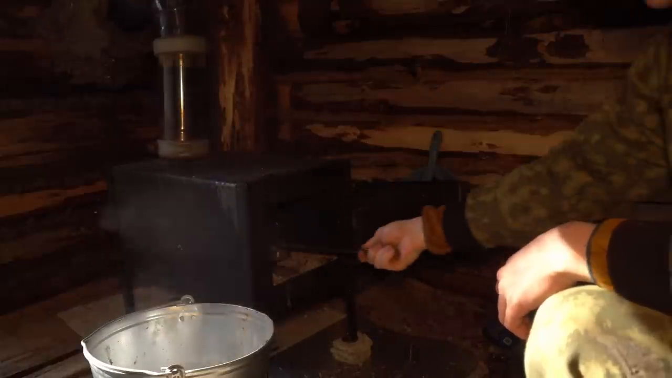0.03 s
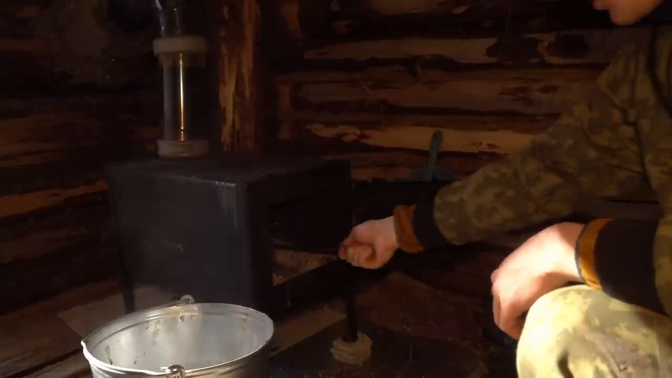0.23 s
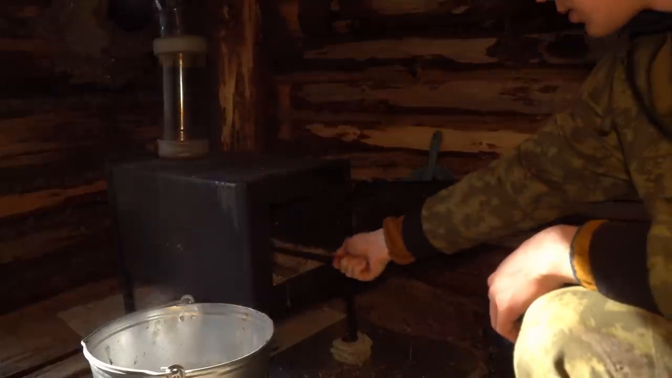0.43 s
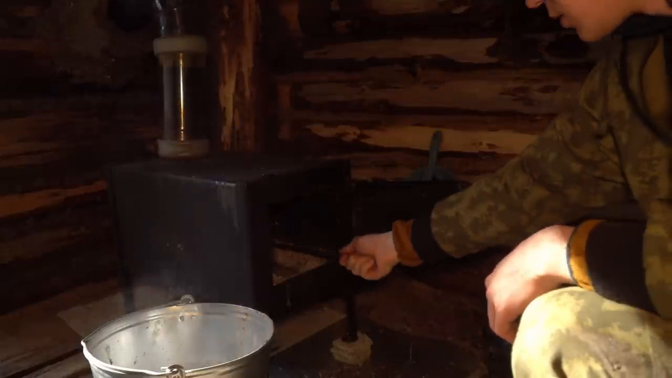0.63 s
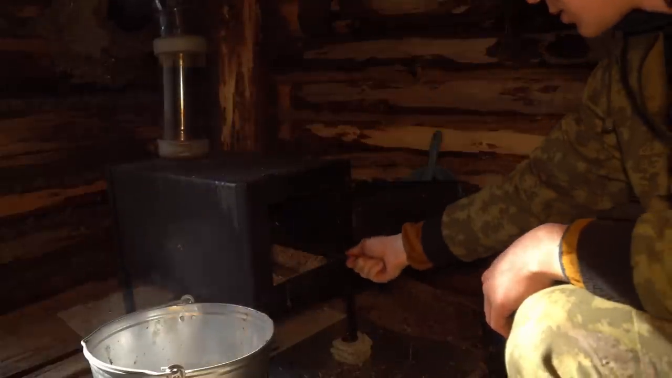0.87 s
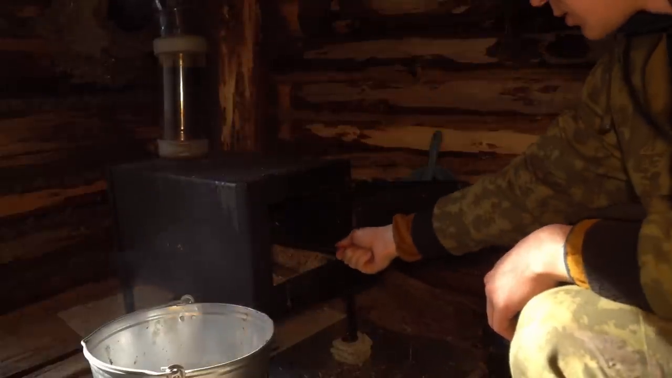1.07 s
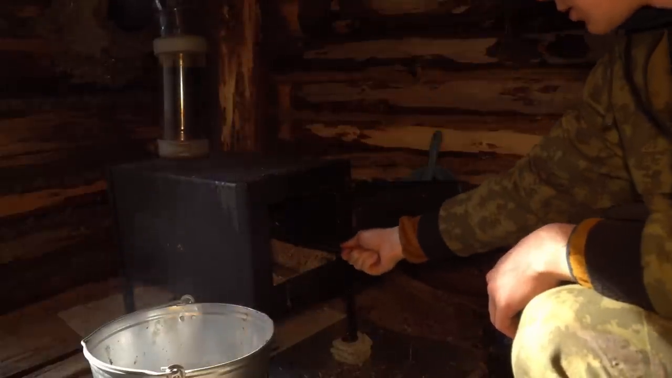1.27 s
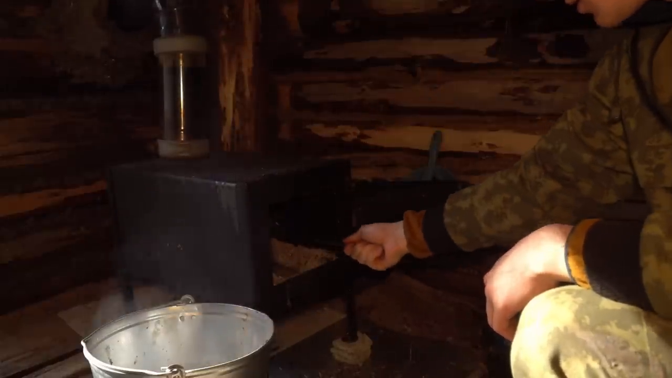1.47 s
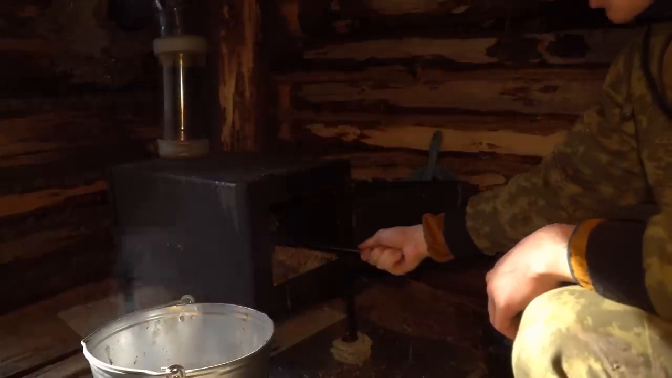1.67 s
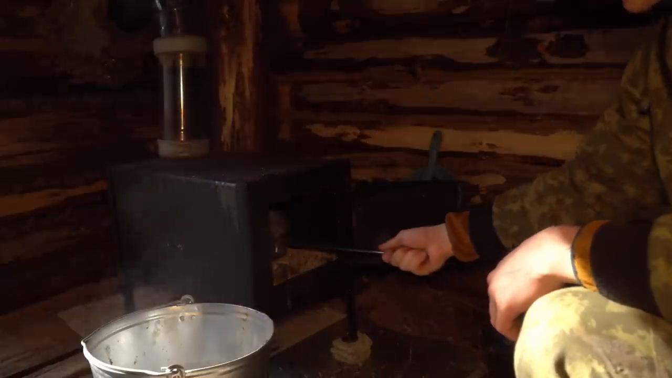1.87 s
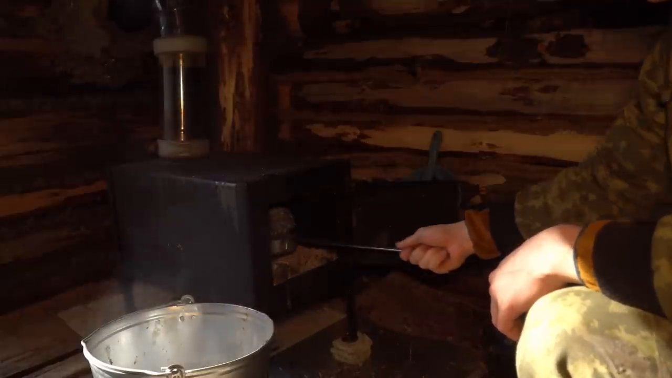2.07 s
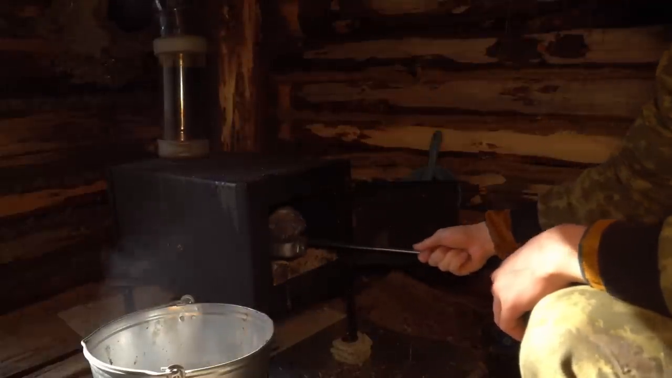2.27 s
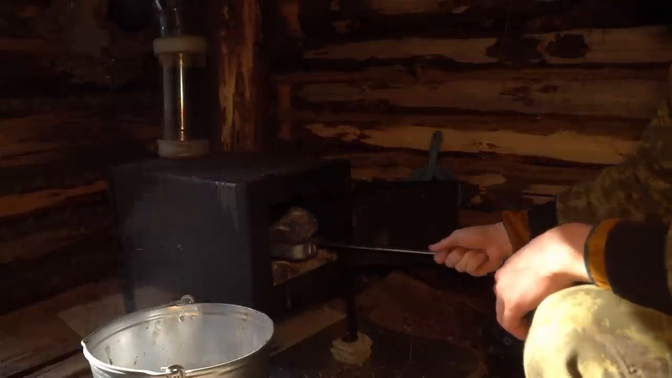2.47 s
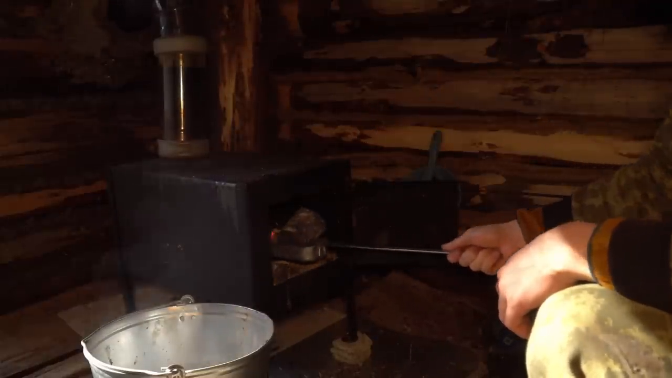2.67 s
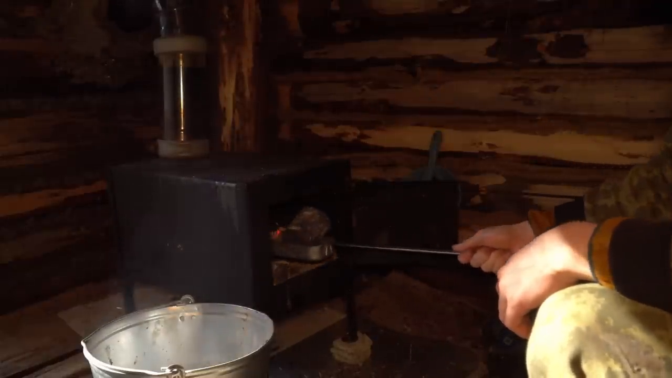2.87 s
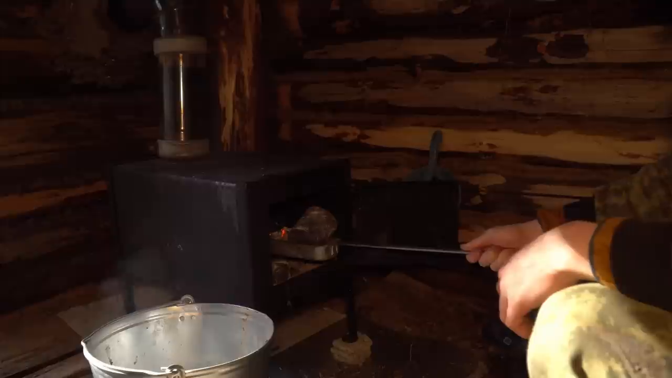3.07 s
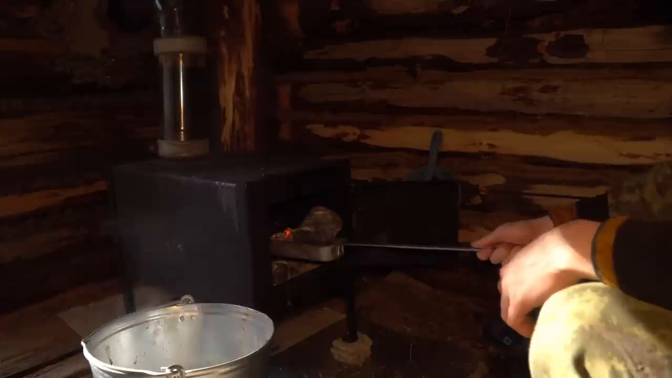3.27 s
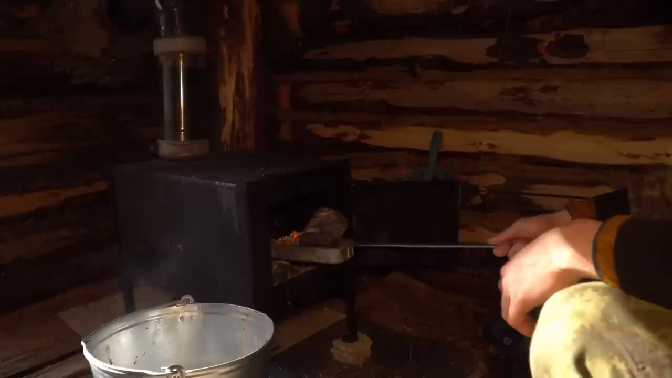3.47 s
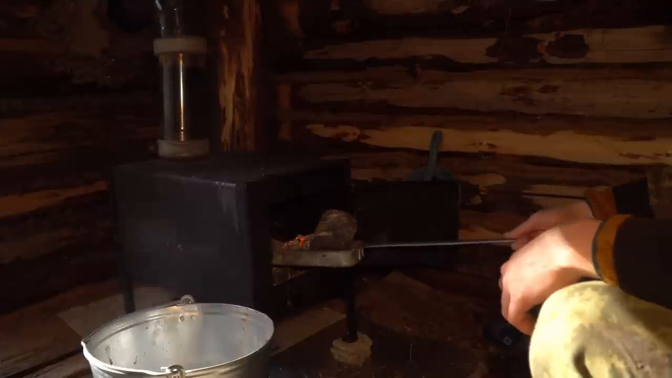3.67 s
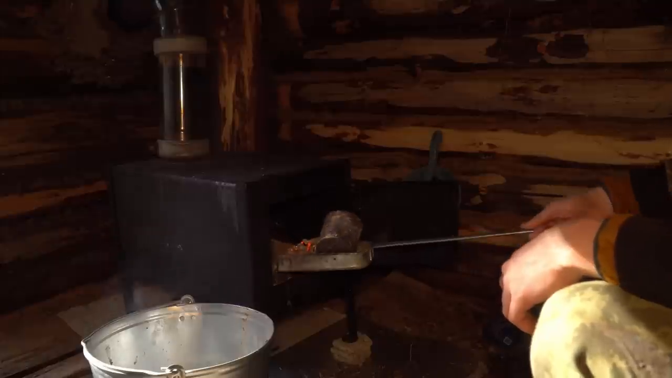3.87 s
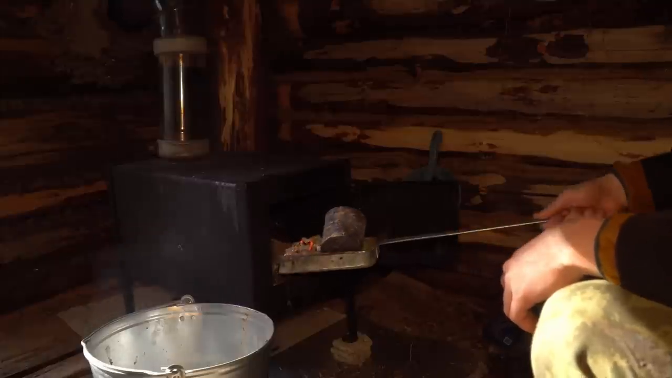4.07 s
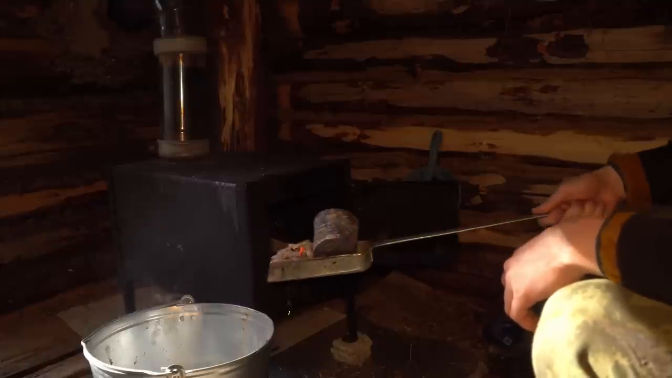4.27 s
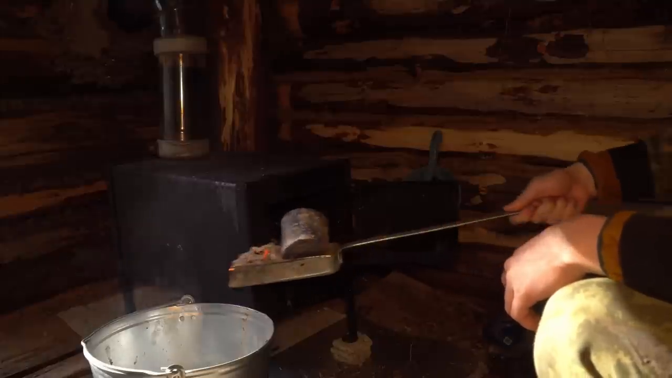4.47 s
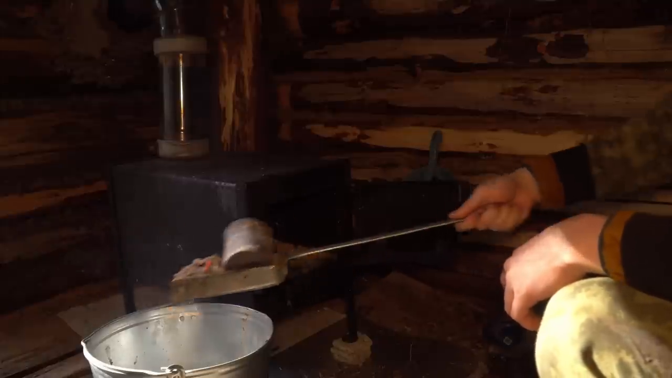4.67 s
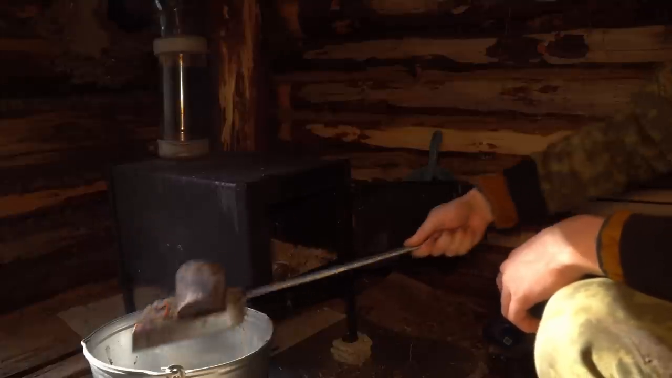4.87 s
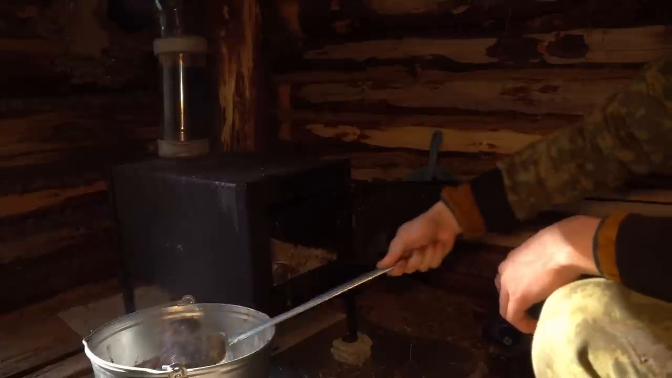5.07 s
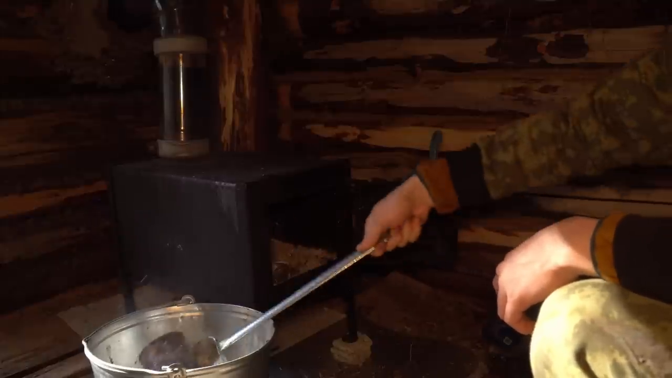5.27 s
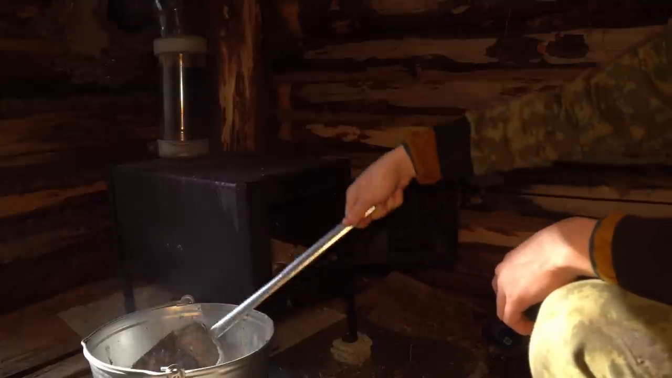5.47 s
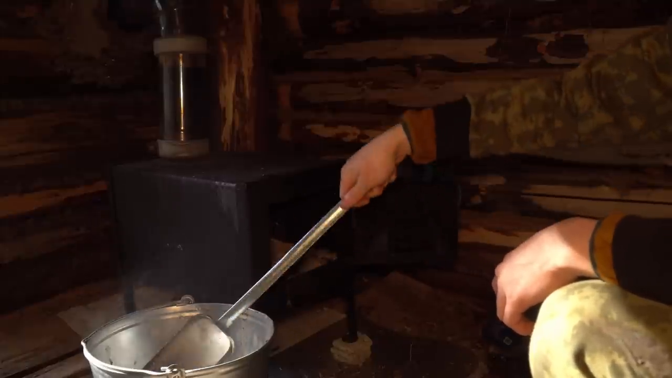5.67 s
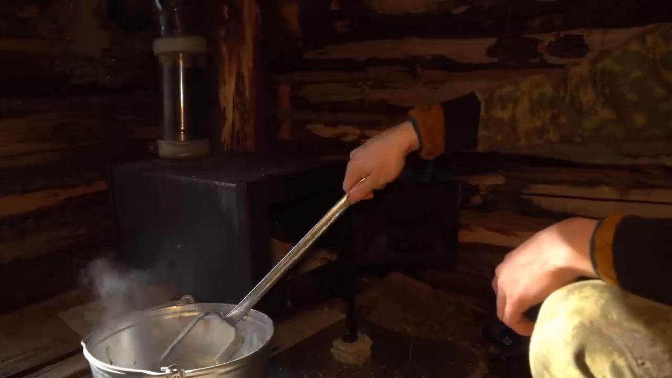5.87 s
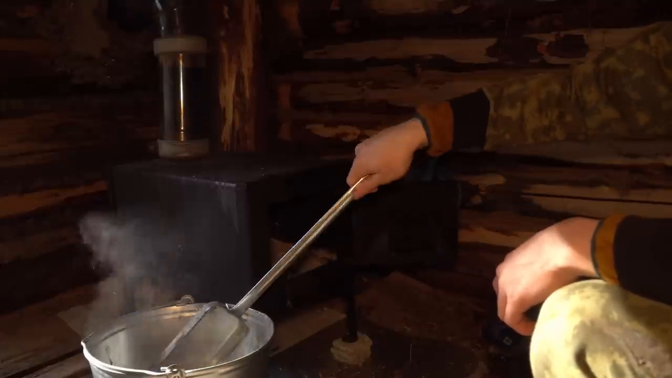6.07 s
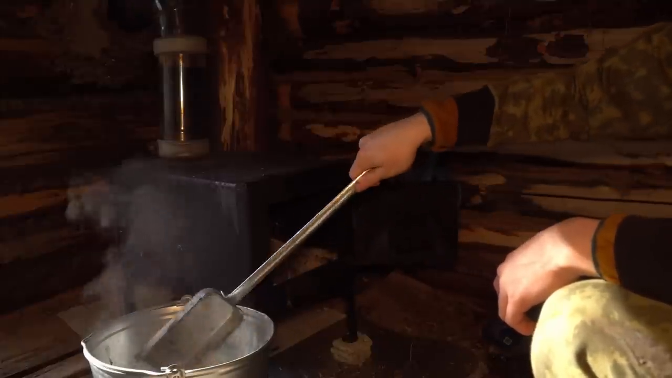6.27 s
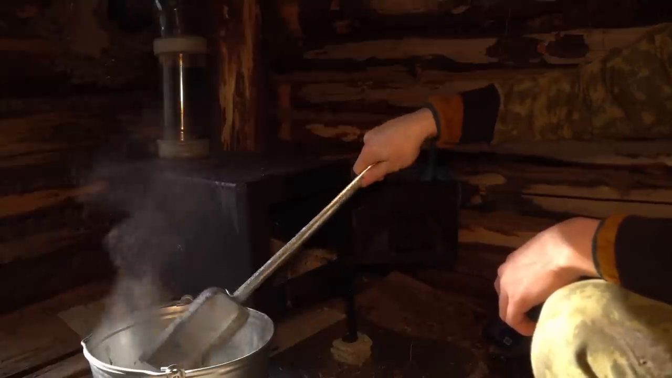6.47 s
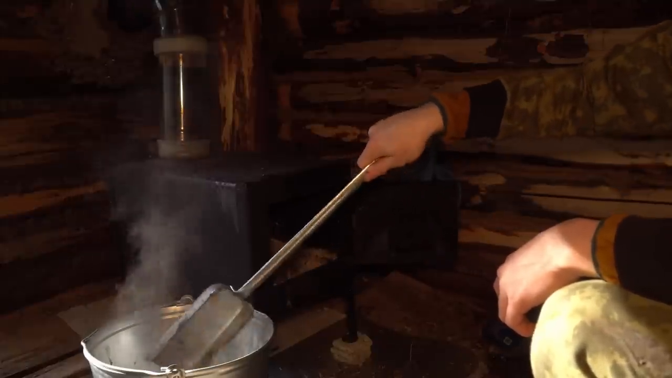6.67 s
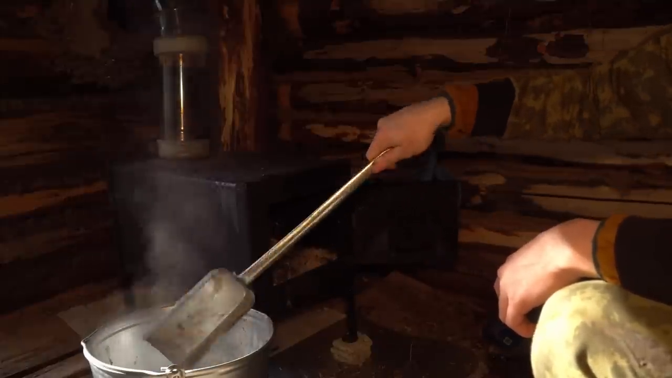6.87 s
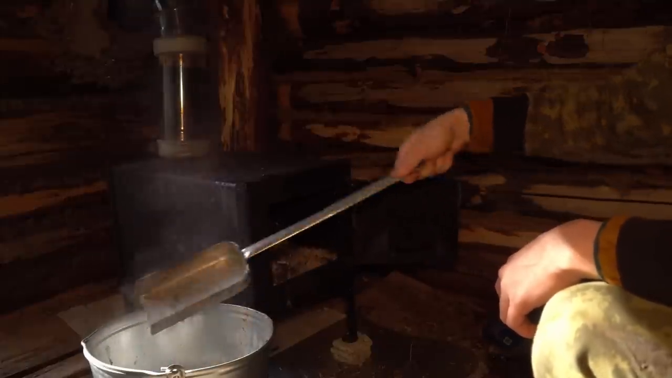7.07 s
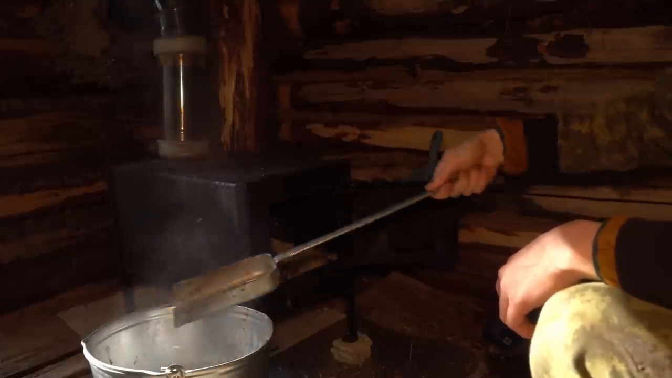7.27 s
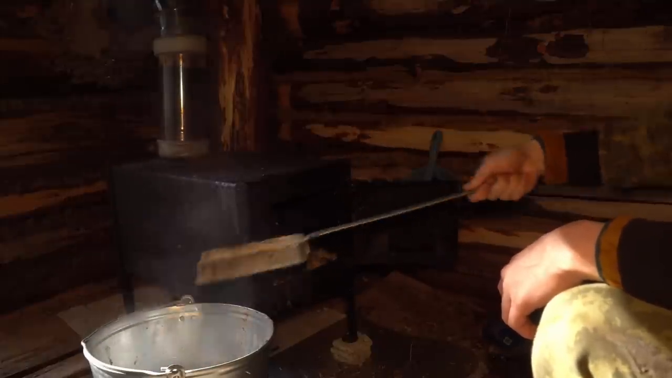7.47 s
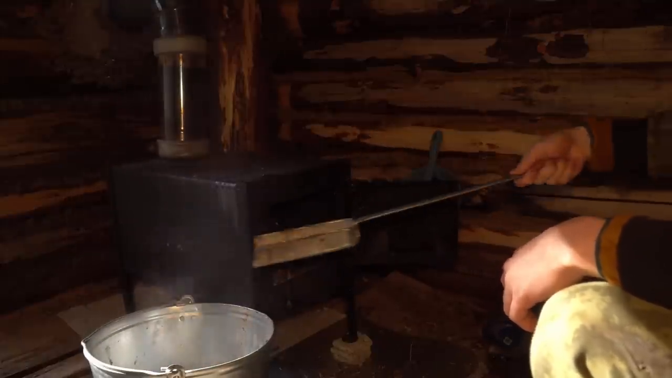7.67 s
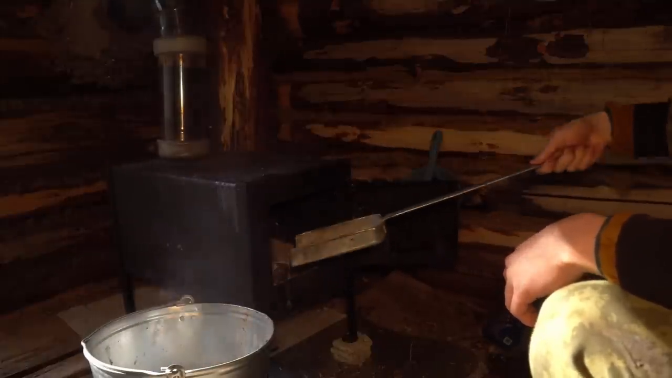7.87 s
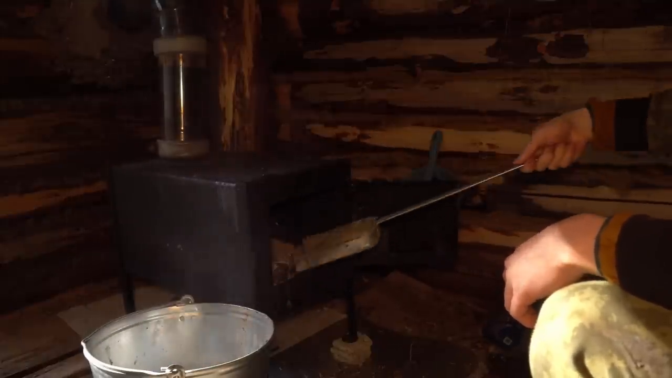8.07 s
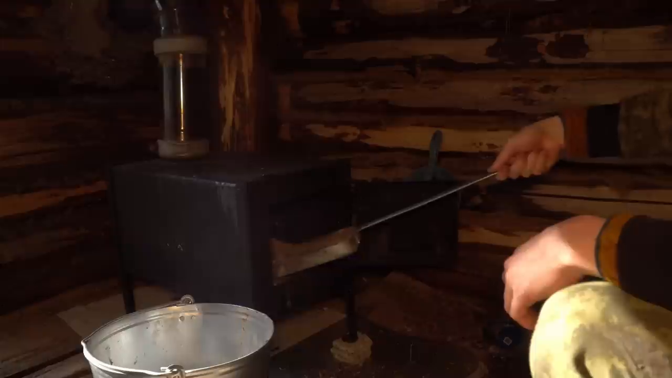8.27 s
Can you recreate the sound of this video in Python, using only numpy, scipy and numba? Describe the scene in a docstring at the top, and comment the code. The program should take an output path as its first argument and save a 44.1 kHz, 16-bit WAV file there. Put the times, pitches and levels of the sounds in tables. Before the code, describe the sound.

Close, mono sound in a small log cabin with a short, soft room. From 0 to 1.5 s a steel scoop rakes ash in a sheet-steel stove: coarse, gritty scrapes, sharp clanks at about 0.05 and 0.85 s, and a dense, ringing flurry at 1.25-1.4 s, over deep rumbling boards. Light ticks trail off by 1.9 s. From 2 to 3.5 s it is quiet: a faint, far finch sings fast sliding whistles, with dull wooden knocks near 2.3, 2.6 and 3.5 s. A soft low rush swells at 3.7-4.5 s with barely audible ticks. At 5.13 s the load hits a tin bucket with a loud crack and boom; scrapes and raps follow, strong at 5.76, 6.04 and 6.1 s, the last ringing. Then faint ember ticks, tiny clicks and thin high bird calls from 7.3 s, until a hard clank and brief scrape at 8.24 s.

```python
"""Raking ash from a stove

A long steel scoop rakes ash and embers in a sheet-steel stove, tips them into a tin bucket and goes back.
Noise grains make the grit; drags and blows ring the resonances of scoop, stove and bucket.
Knocks and a deep rumble come through the boards. Outside the log cabin, gliding whistles make a far finch.
Shaped noise makes the quiet air.
"""
import sys
import numpy as np
from scipy import signal
from scipy.fft import rfft, irfft, next_fast_len
from scipy.io import wavfile
from scipy.ndimage import uniform_filter1d
from numba import njit

SR = 44100
rng = np.random.default_rng(int(sys.argv[2]) if len(sys.argv) > 2 else 0)


def put_to_file(sound):
    """Save the sound as 16-bit audio at rate SR, in the file named by the first command-line argument."""
    columns = np.atleast_2d(sound).T  # one column per channel
    safe = np.clip(columns, -1, 1)
    whole_steps = np.round(safe * 32767)
    wavfile.write(sys.argv[1], SR, whole_steps.astype(np.int16))


N = 366471

# stages of the work: (start [s], scoop damping [1/s], stove or bucket damping [1/s],
#   grit on the bare rim against the drag [dB], grit on the stove or bucket against the drag [dB])
WORK_STAGES = [(0, 127, 22, -27, -36.5), (.5, 118, 40, -33.5, -44), (1.25, 57, 3.4, -36, -63),
               (1.43, 21, 8.2, -34, -34), (4.75, 37, 4, -29.5, -52), (5.13, 140, 12, -22.5, -48),
               (5.2, 57, 6.3, -31, -36.5), (5.53, 29, 7.4, -27, -52.5), (5.821, 7.3, 4, -35, -32.5),
               (6.1, 160, 4, -17, -43), (6.25, 43, 4.1, -29, -20), (6.8, 53, 4, -26, -49),
               (7.37, 6.6, 4.7, -35, -50), (8.229, 73, 9.6, -16.5, -49)]
# the scoop is over the bucket: (from [s], until [s])
OVER_BUCKET = (4.7, 7.6)


def shovelling():
    """Grit and blows crackle, shake the scoop and boom in whichever vessel the scoop is in."""
    t = np.arange(N) / SR
    in_bucket = (t > OVER_BUCKET[0]) & (t < OVER_BUCKET[1])
    since, *settings = np.transpose(WORK_STAGES)
    stage = np.clip(np.searchsorted(since, t) - 1, 0, None)
    scoop_damping, vessel_damping, rim_db, vessel_db = np.array(settings)[:, stage]
    crackle, on_rim, on_blade, on_vessel = drags(in_bucket, rim_db, vessel_db)
    add_blows(crackle, on_rim, on_blade, on_vessel)
    add_ember_ticks(crackle)
    return (crackle + scoop(on_blade, on_rim, scoop_damping)
            + stove_and_bucket(on_vessel, in_bucket, vessel_damping))


# drags through ash and slides of the load: (start [s], length [s], grit [dB], push on the scoop before a cut [dB])
DRAGS = [(-.03, .13, -33, -34), (0.109, .32, -37.5, -19.5), (0.486, 0.42, -59.5, -47),
         (0.888, 0.11, -51.5, -41), (0.941, .06, -47.5, -43), (1.009, .08, -37, -22.5),
         (1.141, 0.065, -42.5, -39), (1.254, 0.012, -17.5, -25), (1.323, 0.03, -25.5, -21.5),
         (1.381, 0.036, -38, -27.5), (1.479, 0.48, -53, -73), (3.8, 0.84, -76, -72),
         (4.779, 0.12, -56, -58.5), (4.924, 0.069, -50, -62.5), (5.12, 0.044, -33, -15),
         (5.19, 0.095, -54, -28.5), (5.291, 0.14, -41, -50.5), (5.473, .14, -49.5, -42),
         (5.605, 0.14, -38.5, -24.5), (5.739, 0.057, -29, -35), (5.838, 0.19, -56.5, -53),
         (6.045, 0.068, -40.5, -38.5), (6.095, 0.052, -23, -17.5), (6.219, 0.35, -63.5, -71),
         (6.85, 0.41, -71, -87), (8.236, 0.019, -28, -36)]
DRAG_ATTACK_S, DRAG_RELEASE_S = .008, 0.024
# tone of ash on the stove floor: (pitch [Hz], relative level [dB per Hz])
STOVE_ASH = [(180, -44), (300, -8.5), (546, -13.5), (737, -2.5), (1840, -19.5), (4910, -16.5), (6620, -24),
             (14500, -31.5), (16000, -31)]
# tone of ash and embers against tin: (pitch [Hz], relative level [dB per Hz])
BUCKET_ASH = [(180, -35), (300, -15.5), (565, -19.5), (787, -7.5), (1010, -21), (1360, -14), (2170, -19),
              (2880, -12), (16000, -39.5)]
CINDER_DB, CINDERS_PER_S = -12.5, 250  # hard bits that snap in the grit, level against the drag
EMBER_DB, EMBERS_PER_S = -80.5, 35  # faint crackle of the glowing load


def drags(in_bucket, rim_db, vessel_db):
    """Grains of grit scrape past an edge that sticks and slips; they are heard directly and push the metal."""
    start, length, grit_db, blade_db = np.transpose(DRAGS)
    grit = swells(start, length, grit_db, DRAG_ATTACK_S, DRAG_RELEASE_S)
    blade = swells(start, length, blade_db, DRAG_ATTACK_S, DRAG_RELEASE_S)
    slips = stick_slip(120, .005, 1.)
    ash = grains(9000, 1.1)
    ash = np.where(in_bucket, unit(colour(ash, BUCKET_ASH)), unit(colour(ash, STOVE_ASH)))
    cinders = undb(CINDER_DB) * snaps(CINDERS_PER_S, 4, 0.00069)
    embers = undb(EMBER_DB) * snaps(EMBERS_PER_S, 3, .004)
    crackle = grit * (slips * ash + cinders) + embers
    on_rim = undb(rim_db) * grit * slips * grains(1700, 1.2)
    on_blade = undb(-35.5) * blade * slips * grains(1200, 3.3)
    on_vessel = undb(vessel_db) * grit * grains(400, 1.2)
    return crackle, on_rim, on_blade, on_vessel


# blows of the scoop: (time [s], crack level [dB], crack centre [Hz], scoop push before a boost [dB],
#   stove or bucket push before a boost [dB], clink against crack before a boost [dB], clink centre [Hz])
BLOWS_OF_SCOOP = [(0.0538, -16, 1220, -16, -39.5, 0, 1250), (0.2664, -29, 1300, -21.5, -45, 1, 1320),
                  (0.3895, -30, 1390, -13, -29.5, 4, 1070), (0.4054, -27.5, 1160, -17, -74, 12, 1180),
                  (0.7667, -35.5, 1100, -41, -58, 2, 1050), (0.8445, -13.5, 1060, -16, -38.5, 0, 1120),
                  (0.9133, -37, 1130, -30, -59, 7, 1150), (1.0251, -26.5, 1137, -18.5, -43, -4.5, 1180),
                  (1.047, -23.5, 1205, -29, -36, -1.5, 1170), (1.0974, -24.5, 1322, -36.5, -52, -9, 1307),
                  (1.1834, -37, 5960, -25, -51, -4.5, 1375), (1.256, -17.5, 3615, -15.5, -19.5, -5, 1058),
                  (1.2844, -18.5, 1140, -21, -25.5, -1, 1140), (1.3204, -15.5, 1112, -14, -30, -3.5, 1050),
                  (1.3448, -14.5, 1130, -15.5, -30.5, 2, 1134),
                  (1.3907, -11.5, 1250, -28.5, -23, -19, 1253),
                  (1.4112, -16, 1270, -25.5, -30.5, -3.5, 1310), (1.7519, -29.5, 3350, -63, -69, -11, 2540),
                  (1.8064, -35.5, 1280, -55, -34.5, -35, 1270), (1.8851, -35, 2260, -57, -50, -26, 2160),
                  (2.5134, -43.5, 2980, -60, -78, -21, 2860), (2.6595, -57, 1260, -64.5, -67, -14, 1260),
                  (3.8784, -56, 1396, -59, -74, -13, 1400), (4.3555, -64, 1690, -63, -78, -9, 1080),
                  (4.5226, -47, 6300, -54, -86.5, -9, 3030), (4.7905, -47, 3760, -63, -71, -16, 1630),
                  (4.8234, -37.5, 3400, -49.5, -78, -2, 3420), (4.9367, -32, 2345, -44, -62, -11.5, 2400),
                  (5.1327, -8, 2310, -30.5, -15.5, -5, 2270), (5.2484, -38, 1370, -40, -30.5, -5, 1370),
                  (5.3038, -36, 2320, -26.5, -43, -14, 2340), (5.3314, -46, 2850, -47, -43, -16, 2850),
                  (5.3477, -27.5, 2450, -40, -46, 8, 2440), (5.5424, -34.5, 2900, -26.5, -41, -20, 2870),
                  (5.5987, -26.5, 1450, -26, -38, -3, 1450), (5.6121, -22.5, 2690, -16.5, -58, -1.5, 2660),
                  (5.6461, -31.5, 1366, -29, -50.5, -5, 1380), (5.6694, -25.5, 1400, -21.5, -57, 2.5, 1400),
                  (5.7624, -11, 1483, -21, -42, -10.5, 1447), (5.8541, -23, 1410, -47, -46.5, -14, 1423),
                  (6.0444, -19.5, 4370, -38, -37, -11, 1384), (6.1005, -13, 3190, -15, -12.5, -5.5, 3203),
                  (6.4682, -38.5, 2040, -72, -52, -23, 2030), (6.8678, -46.5, 1670, -64, -84, -8, 1660),
                  (7.0778, -38, 1700, -58, -78, -19, 1650), (7.1297, -37.5, 1600, -57, -76, -26, 1570),
                  (7.1676, -45.5, 1605, -84, -81, -19, 1630), (7.3766, -47, 4070, -84, -80, -4, 1133),
                  (7.4425, -50, 3200, -81, -70, -13, 3270), (8.2397, -11, 2230, -40, -33, -10, 2100)]
BLOW_T60_S = .07  # time for a crack to fall by 60 dB
SNAP_RISE_S = .0006


def add_blows(crackle, on_rim, on_blade, on_vessel):
    """Each blow cracks in the air and pushes the rim briefly, the blade longer and the vessel longest."""
    rim_contact_s, blade_contact_s, vessel_contact_s = .0001, .0004, .001
    chatter = .015
    for s, crack_db, crack_hz, blade_db, vessel_db, clink_db, clink_hz in BLOWS_OF_SCOOP:
        add(crackle, s, crack(crack_db, crack_hz, BLOW_T60_S, SNAP_RISE_S))
        add(on_rim, s, undb(crack_db + clink_db + 3) * clink(rim_contact_s, clink_hz))
        add(on_blade, s, undb(blade_db + 4) * push(blade_contact_s, chatter))
        add(on_vessel, s, undb(vessel_db + 2.5) * push(vessel_contact_s, chatter))


# dry ticks of embers: (time [s], level [dB], centre [Hz])
EMBER_TICKS = [(0.638, -38.5, 4000), (1.6746, -36.5, 4000), (3.1358, -47.5, 3160), (3.595, -53.5, 5700),
               (4.586, -52, 6100), (6.428, -41.5, 5230), (6.5324, -38.5, 4560), (6.7126, -52, 2800),
               (6.9381, -52, 3460), (7.6008, -45, 2670), (7.7124, -57, 4970), (7.886, -57, 7560),
               (7.996, -52, 3380), (8.073, -45, 5380), (8.1314, -42, 2690)]
TICK_T60_S = 0.047


def add_ember_ticks(crackle):
    """Single embers tick as short puffs of noise."""
    for s, db, hz in EMBER_TICKS:
        add(crackle, s, crack(db, hz, TICK_T60_S, SNAP_RISE_S))


# bending modes of the scoop: (pitch [Hz], relative level [dB], 60 dB fade without added damping [s])
BLADE_MODES = [(716, -7, 1.1), (746, -8, .3), (777, 0, .75), (800, -7, .25), (830, -10, .2), (871, -10, .2),
               (936, -11, .2)]
# higher modes of the scoop: (pitch [Hz], relative level [dB], 60 dB fade without added damping [s])
RIM_MODES = [(1080, -6, .2), (1147, -6, .36), (1310, -5, .4), (1414, 0, .5), (1620, -3, .35),
             (1857, -3, 1.0), (2060, -6, .17), (2326, -2, .2), (2420, -4, .25), (2541, -5, .15),
             (2665, -5, .2), (2855, -2, .25), (2988, -3, .27), (3220, -4, .2), (3320, -3, .25),
             (3690, 0, .18), (4086, -3, .11), (4390, -4, .15), (4900, -5, .17), (5260, -7, .15),
             (5900, -10, .12), (6250, -11, .12)]
BLADE_GRIP = .6  # share of the damping that reaches the bending modes


def scoop(on_blade, on_rim, damping):
    """The steel rings low in its bending modes and high along its rim, more dully when damped."""
    bending = body(band(on_blade, 920, 800), BLADE_MODES, BLADE_GRIP * damping)
    return bending + body(on_rim, RIM_MODES, damping)


# modes of the sheet-steel stove: (pitch [Hz], relative level [dB], 60 dB fade without added damping [s])
STOVE_MODES = [(125, -10, .2), (165, -11, .2), (215, -11, .4), (270, -14, .2), (307, 0, .6), (400, -13, .2),
               (470, -14, .2)]
# modes of the tin bucket: (pitch [Hz], relative level [dB], 60 dB fade without added damping [s])
BUCKET_MODES = [(170, -7, .15), (213, -2, .16), (259, -1, .16), (320, 0, .14), (390, -5, .14),
                (450, -5, .14), (560, -9, .3), (626, -7, .18)]


def stove_and_bucket(force, in_bucket, damping):
    """The force rings the bucket while the scoop is over it, and otherwise the stove."""
    stove = body(force * ~in_bucket, STOVE_MODES, damping)
    return stove + body(force * in_bucket, BUCKET_MODES, damping)


# dull knocks through the boards: (time [s], base level [dB], tick pitch [Hz], contact [s])
BOARD_KNOCKS = [(.689, -33.5, 500, 0.0011), (2.283, -36, 523, 0.0011), (2.574, -31.5, 494, 0.0011),
                (3.516, -25, 550, 0.00094)]
# modes of the planks: (pitch [Hz], relative level [dB], 60 dB fade [s])
PLANK_MODES = [(152.6, 5.5, 0.21), (260, 10, 0.09), (389, 6, 0.17), (679, 11, 0.077), (1080, 12, 0.054)]


def knocks():
    """Soft blows on wood: a tick through the air, and a force with a weak repeat that rings the planks."""
    ticks, force = np.zeros(N), np.zeros(N)
    t = np.arange(int(.03 * SR)) / SR
    for s, db, hz, contact in BOARD_KNOCKS:
        add(ticks, s, undb(db) * np.sin(2 * np.pi * hz * t) * np.exp(-t / 0.0032))
        add(ticks, s, undb(db + 16.5) * band(push(contact / 3, 0), 3 * hz, 4 * hz))
        add(force, s, undb(db - 3.5) * push(contact, 0))
        add(force, s + 0.013, undb(db - 23) * push(contact, 0))
    return ticks + body(force, PLANK_MODES, 0.)


# jolts that set the boards shaking: (time [s], level [dB])
BOARD_JOLTS = [(-.05, -36), (.17, -36), (0.448, -30.5), (.75, -35), (1.019, -37.5), (1.262, -25.5),
               (1.598, -37), (1.87, -38.5), (2.2, -44.5), (2.571, -40), (3.5, -43), (3.75, -49.5),
               (4.1, -53), (4.75, -52.5), (5.14, -24), (5.319, -32), (5.622, -36.5), (5.852, -26.5),
               (6.118, -29), (7.5, -44), (8.22, -46)]
JOLT_RISE_S, JOLT_HOLD_S, JOLT_FADE_S = 0.016, .06, 0.12
# resonances of the floor boards: (pitch [Hz], width [Hz], relative level [dB])
BOARD_MODES = [(36.15, 9, 3.5), (42, 8.9, -2), (57.5, 16, -31.5)]
BOARDS_REST_DB, SWAY_REST_DB = -57, -43.5  # levels that stay between jolts
SWAY_DB = -2.5  # sway against the jolt


def rumble():
    """Floor boards shake at the edge of hearing, over a slower sway: narrow bands of deep noise."""
    s, db = np.transpose(BOARD_JOLTS)
    jolts = swells(s, np.full(len(s), JOLT_HOLD_S), db, JOLT_RISE_S, JOLT_FADE_S)
    shake = np.zeros(N)
    for hz, width, level_db in BOARD_MODES:
        deep = band(band(rng.standard_normal(N), hz, width), hz, 2 * width)
        shake += undb(level_db) * unit(deep)
    sway = band(band(band(rng.standard_normal(N), 12, 9.9), 12, 9.9), 21, 20)
    shake_level = jolts + undb(BOARDS_REST_DB)
    sway_level = undb(SWAY_DB) * jolts + undb(SWAY_REST_DB)
    return shake_level * unit(shake) + sway_level * unit(sway)


# finch notes: (time [s], length [s], start pitch [Hz], end pitch [Hz], level before the echoes [dB])
FINCH_NOTES = [(1.961, 0.078, 3070, 3800, -70.5), (2.045, 0.083, 3590, 2950, -103),
               (2.12, 0.038, 4380, 2560, -66.5), (2.214, 0.038, 4780, 3900, -75),
               (2.3, 0.07, 3950, 2230, -70), (2.392, 0.09, 4710, 3500, -72.5),
               (2.49, 0.063, 3265, 2440, -70), (2.56, 0.042, 5180, 4000, -71.5),
               (2.672, 0.029, 4180, 2420, -66.5), (2.78, 0.064, 4040, 2240, -68.5),
               (2.903, 0.097, 4160, 2050, -72.5), (3.017, 0.052, 4145, 2065, -70),
               (3.123, 0.067, 5480, 4280, -74), (3.23, 0.064, 4310, 1880, -70),
               (3.357, 0.066, 2180, 3760, -72.5), (3.458, 0.019, 3280, 3840, -68),
               (7.27, 0.078, 7500, 8160, -82), (7.9, 0.025, 7650, 8050, -68.5),
               (8.144, 0.065, 7600, 8000, -75)]


def finch():
    """Slurred, buzzy whistles; the trees smear the song, while the thin high calls have a shorter, weaker tail."""
    song, calls = np.zeros(N), np.zeros(N)
    for s, length, start_hz, end_hz, db in FINCH_NOTES:
        u = np.linspace(0, 1, int(length * SR))  # progress through the note
        buzz_hz = 0.24 * abs(end_hz - start_hz) * np.sin(2 * np.pi * 140 * length * u)
        hz = start_hz + (end_hz - start_hz) * u ** 1.3 + buzz_hz
        whistle = np.sin(2 * np.pi * np.cumsum(hz) / SR)
        note = undb(db) * np.sin(np.pi * u) ** 1.5 * whistle
        add(calls if start_hz > 6500 else song, s, note)
    return echoes(song, .7, .6, 11) + echoes(calls, .2, .15, 0)


# tone of the cabin air: (pitch [Hz], relative level [dB per Hz])
AIR_TONE = [(47, -30.5), (80, -6.5), (109, -9), (242, -12), (515, -13.5), (1530, -27), (3390, -25.5),
            (6170, -31), (13400, -33.5), (16000, -32.5)]
AIR_DB = -68
RUSH_S, RUSH_LENGTH_S, RUSH_EDGE_S, RUSH_DB = 3.72, .75, 0.022, -70.5


def air():
    """Quiet cabin air, drifting a little, with a soft low rush that swells once: both are shaped noise."""
    rush = unit(band(band(rng.standard_normal(N), 444, 140), 413, 300))
    swell = swells([RUSH_S], [RUSH_LENGTH_S], [RUSH_DB], RUSH_EDGE_S, RUSH_EDGE_S)
    still = unit(colour(rng.standard_normal(N), AIR_TONE))
    return undb(AIR_DB + 0.48 * walk(10.0)) * still + swell * undb(1.6 * walk(18)) * rush


def push(length, chatter):
    """A contact force: one half-sine of area 1, then a little chatter."""
    t = np.arange(int(.02 * SR)) / SR
    force = np.sin(np.pi * np.minimum(t / length, 1))
    return force / np.sum(force) + chatter * rng.standard_normal(len(t)) * np.exp(-t / 0.0052)


def clink(length, hz):
    """A hard contact that reaches all modes a little and those near hz most."""
    force = push(length, .04)
    return band(force, hz, .12 * hz) + .15 * force


def crack(db, hz, t60, rise):
    """A snap of noise around hz with a little broad treble."""
    noise = burst(t60, rise)
    return undb(db) * (2.22 * band(noise, hz, 0.54 * hz) + 0.1 * band(noise, 7000, 10000))


def burst(t60, rise):
    """Noise that rises fast and dies away."""
    t = np.arange(int(.25 * SR)) / SR
    envelope = (1 - np.exp(-t / rise)) * 10 ** (-3 * t / max(t60, .004))
    return rng.standard_normal(len(t)) * envelope / 2


def grains(rate, scatter_db):
    """Clicks at random moments, of uneven size but none huge, rms 1."""
    hit = rng.random(N) < rate / SR
    size = np.minimum(rng.exponential(size=N), 3)
    return unit(hit * rng.standard_normal(N) * undb(scatter_db * size))


def snaps(rate, scatter_db, fade):
    """Sparse bright ticks, each a tiny puff of noise, rms 1."""
    puffs = signal.lfilter([1], [1, -np.exp(-1 / (fade * SR))], np.abs(grains(rate, scatter_db)))
    return unit(band(puffs * rng.standard_normal(N), 8000, 17000))


def stick_slip(rate, fade, steady):
    """Force of an edge that drags steadily and breaks loose in sudden jerks, rms 1."""
    jerks = (rng.random(N) < rate / SR) * np.minimum(rng.exponential(size=N), 3)
    fading_jerks = signal.lfilter([1], [1, -np.exp(-1 / (fade * SR))], jerks)
    return unit(steady + unit(fading_jerks))


def swells(starts, lengths, dbs, attack, release):
    """Gain of events that rise, hold and die away exponentially."""
    out = np.zeros(N)
    for s, length, db in zip(starts, lengths, dbs):
        t = np.maximum(np.arange(N) / SR - s, 0)
        fade = np.exp(-np.maximum(t - length, 0) / release)
        out = out + undb(db) * (1 - np.exp(-t / attack)) * fade
    return out


def walk(rate):
    """A level that glides between random values, rate of them a second; spread about a third."""
    k = int(SR / rate)
    steps = np.repeat(rng.standard_normal(N // k + 1), k)
    return 0.4 * uniform_filter1d(steps, k)[:N]


@njit
def ring(x, poles, gains, loss):
    """Modes of a solid body; loss is a factor per sample that adds damping which can change in time."""
    y = np.zeros(len(x))
    for m in range(len(poles)):
        z = 0j
        for i in range(len(x)):
            z = z * poles[m] * loss[i] + x[i]
            y[i] += gains[m] * z.imag
    return y


def body(x, modes, damping):
    """Ring a table of modes with extra damping in 1/s; neighbouring modes swing in opposite phase."""
    hz, db, t60 = np.transpose(modes)
    poles = np.exp((2j * np.pi * hz - np.log(1000) / t60) / SR)
    loss = np.exp(-np.clip(damping, 0, None) * np.ones(N) / SR)
    gains = (-1) ** np.arange(len(hz)) * undb(db) / np.sqrt(np.sum(undb(2 * db)))
    return ring(x + 1e-18, poles, gains, loss)  # the tiny offset keeps the sums away from zero


def band(x, hz, width):
    """One resonance, gain 1 at the centre."""
    return signal.lfilter(*signal.iirpeak(min(hz, .45 * SR), hz / width, SR), x)


def colour(x, points):
    """Shape a long sound by (pitch [Hz], level [dB]) points."""
    hz, db = np.transpose(points)
    size = next_fast_len(N)
    f = np.arange(size // 2 + 1) * SR / size + 1  # +1 avoids the logarithm of zero
    gain = undb(np.interp(np.log(f), np.log(hz), db))
    return irfft(rfft(x, size) * gain, size)[:N]


def echoes(x, t60, treble_t60, wet_db):
    """Add a diffuse noise tail: a low band and a full-range part, each dying at its own pace."""
    t = np.arange(int(.8 * SR)) / SR
    noise = rng.standard_normal((2, len(t)))
    low = band(noise[0], 340, 2100) * 10 ** (-3 * t / t60)
    bright = 0.64 * noise[1] * 10 ** (-3 * t / treble_t60)
    tail = (low + bright) * (1 - np.exp(-t / 0.00078))
    return x + undb(wet_db) * signal.fftconvolve(x, tail / np.sqrt(np.sum(tail ** 2)))[:N]


def add(track, s, sound):
    """Mix a short sound in at s seconds."""
    i = int(s * SR)
    track[i:i + len(sound)] += sound[:N - i]


def undb(db):
    """Decibels to gain."""
    return 10 ** (np.asarray(db) / 20)


def unit(x):
    """Scale to rms 1."""
    return x / np.sqrt(np.mean(x ** 2))


def scene():
    """Log walls give the work a short, soft room; rumble, finch and air join it."""
    room = echoes(shovelling() + knocks(), .2, .14, -12)
    return (room + rumble() + finch() + air())[None]


TOP_HZ = 15900


def record(dry):
    """A steep low-pass filter cuts the top."""
    return signal.sosfilt(signal.ellip(8, .2, 60, TOP_HZ, fs=SR, output="sos"), dry)


dry = scene()
out = record(dry)
put_to_file(out)
```